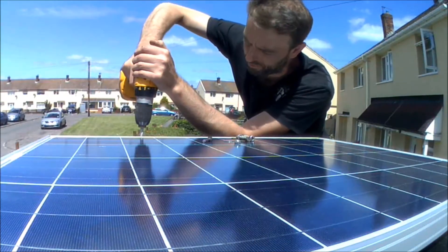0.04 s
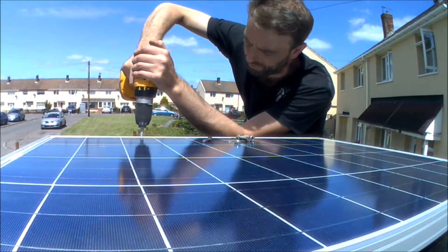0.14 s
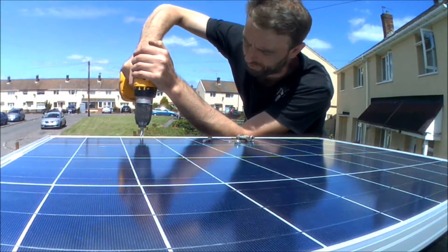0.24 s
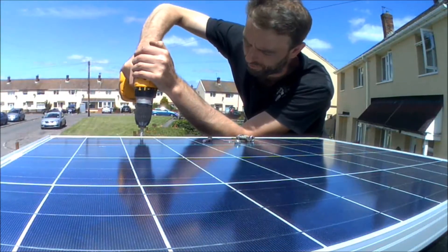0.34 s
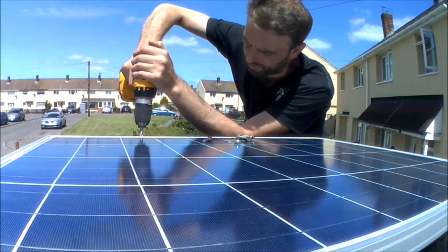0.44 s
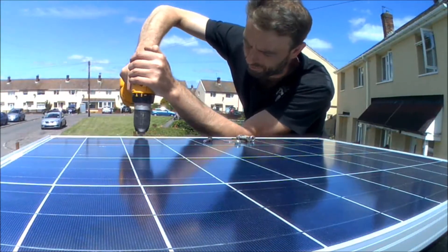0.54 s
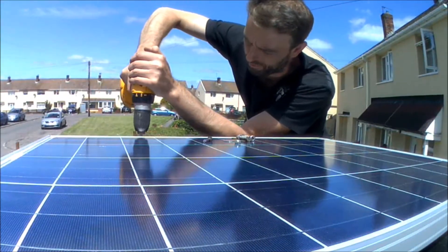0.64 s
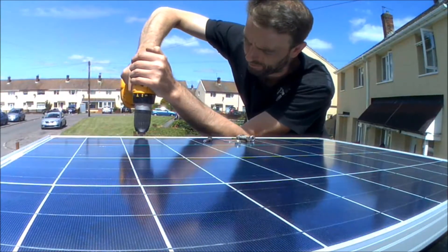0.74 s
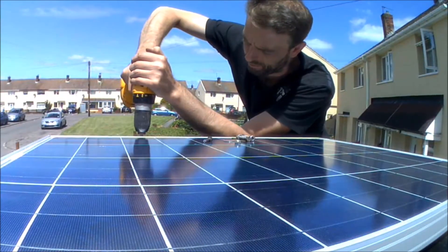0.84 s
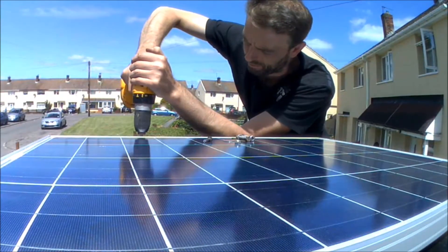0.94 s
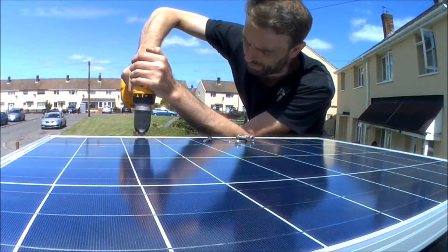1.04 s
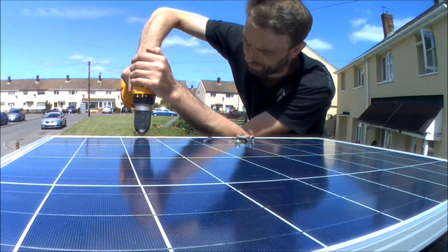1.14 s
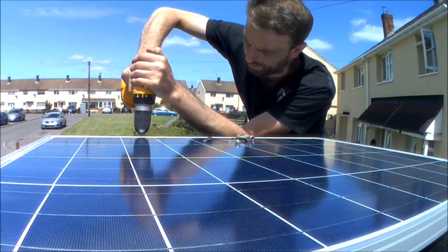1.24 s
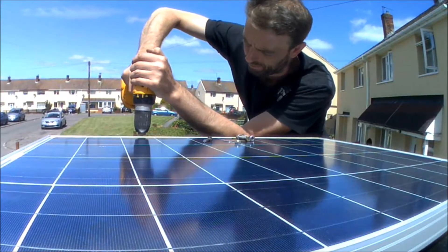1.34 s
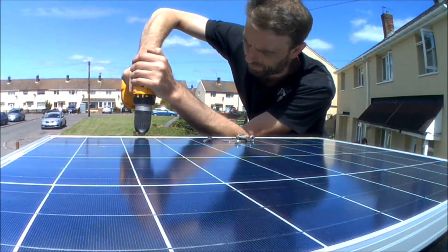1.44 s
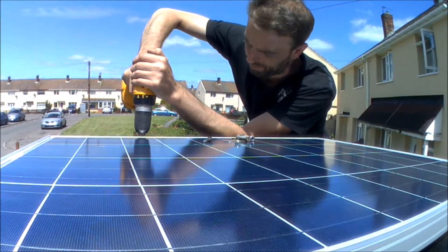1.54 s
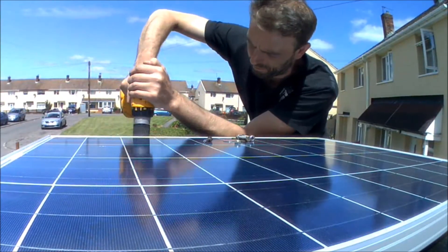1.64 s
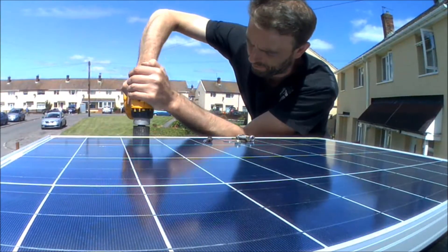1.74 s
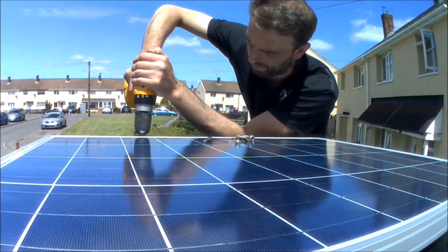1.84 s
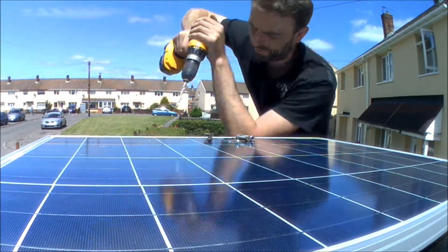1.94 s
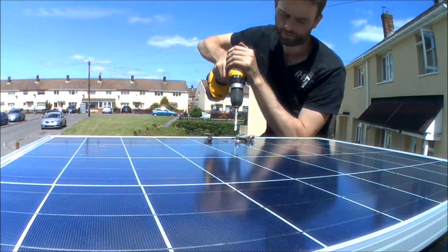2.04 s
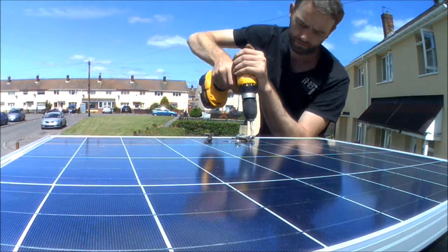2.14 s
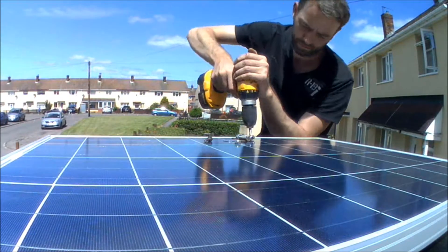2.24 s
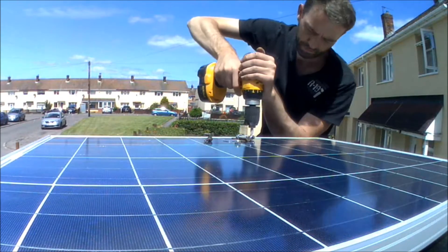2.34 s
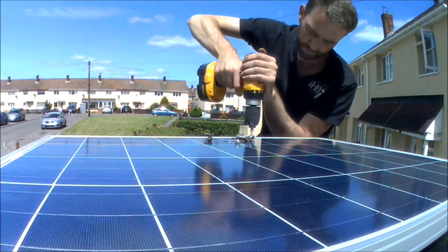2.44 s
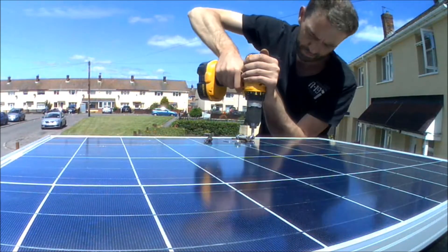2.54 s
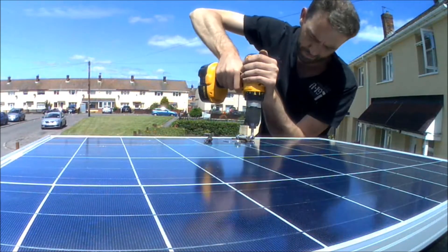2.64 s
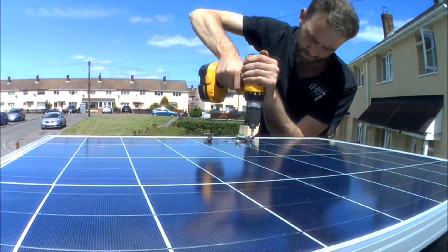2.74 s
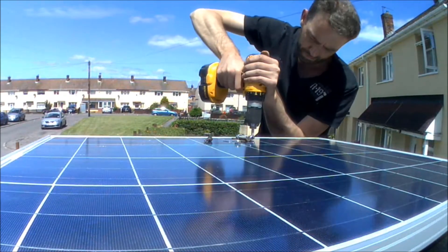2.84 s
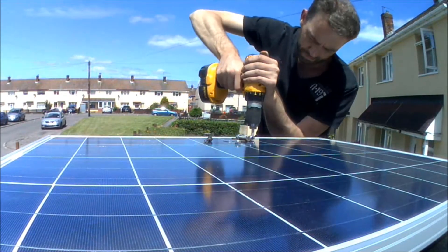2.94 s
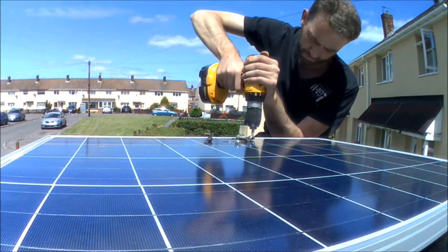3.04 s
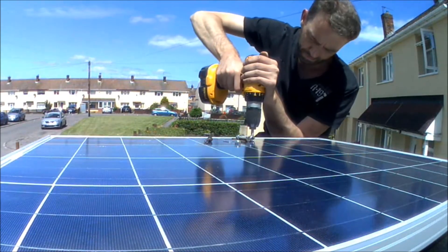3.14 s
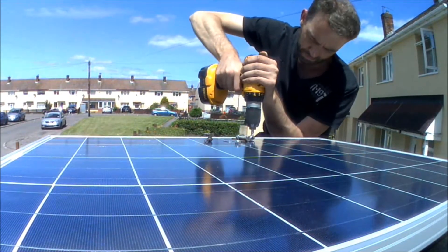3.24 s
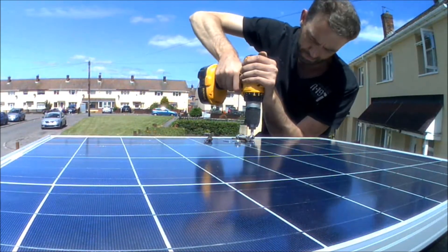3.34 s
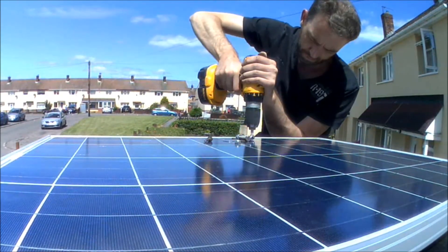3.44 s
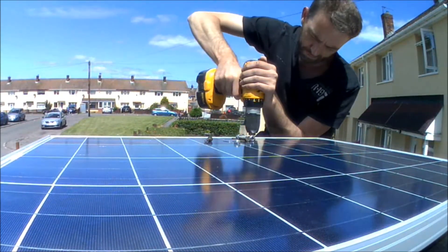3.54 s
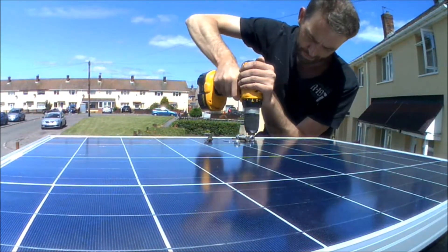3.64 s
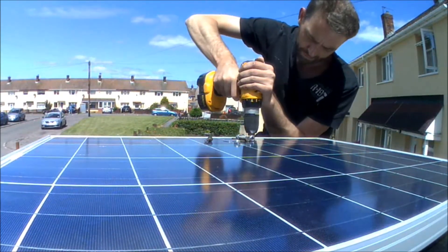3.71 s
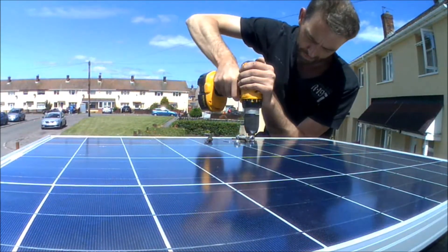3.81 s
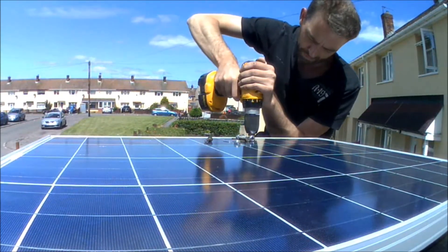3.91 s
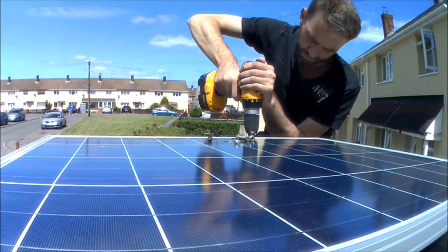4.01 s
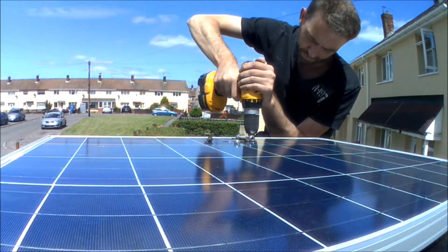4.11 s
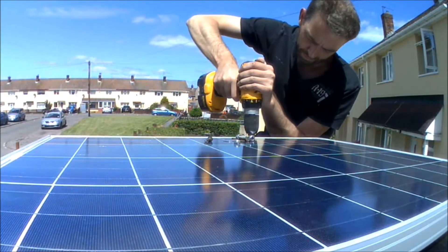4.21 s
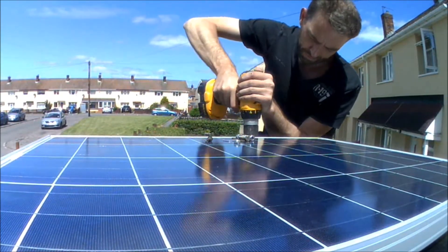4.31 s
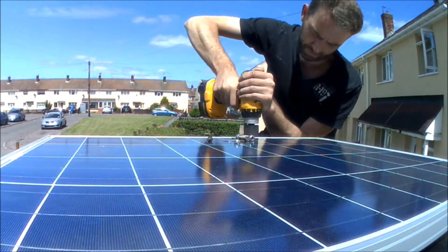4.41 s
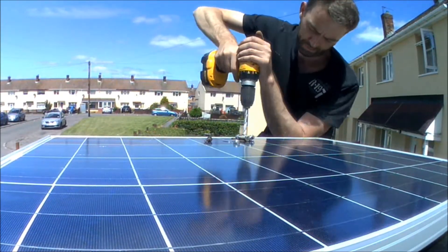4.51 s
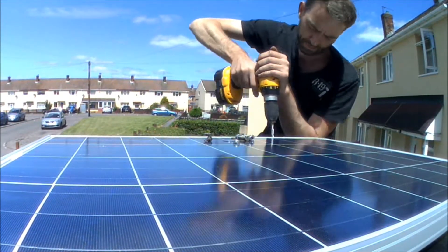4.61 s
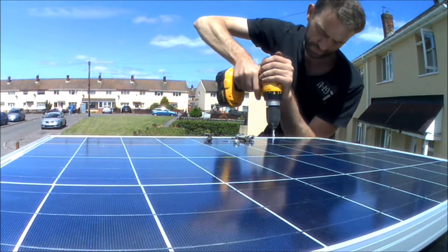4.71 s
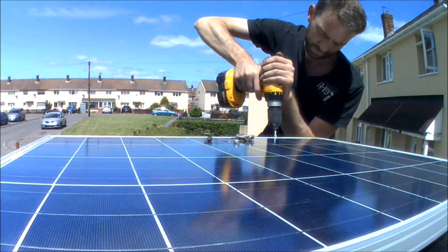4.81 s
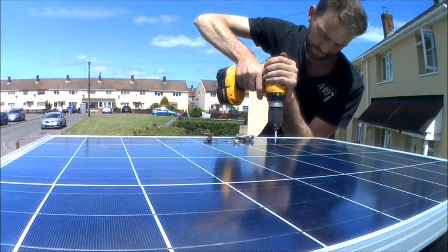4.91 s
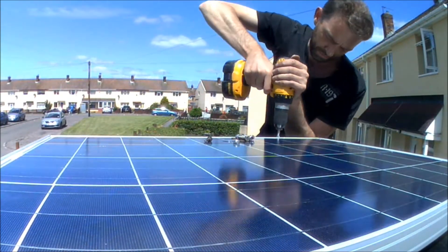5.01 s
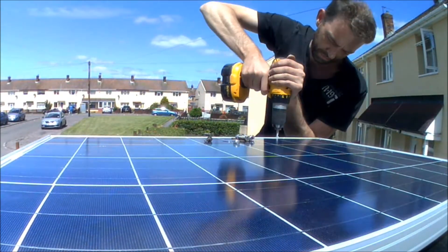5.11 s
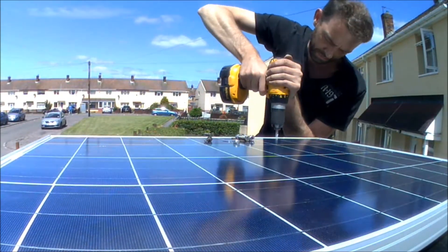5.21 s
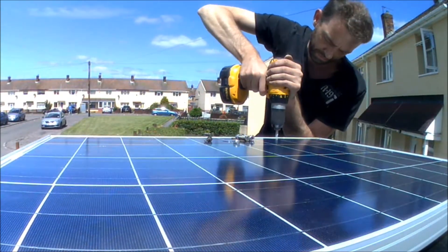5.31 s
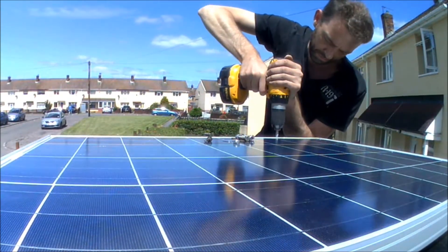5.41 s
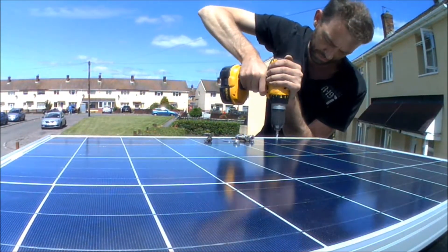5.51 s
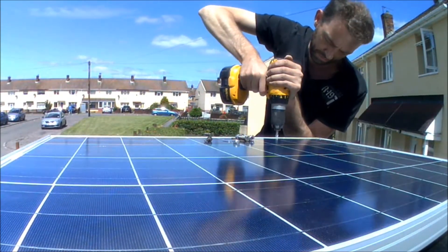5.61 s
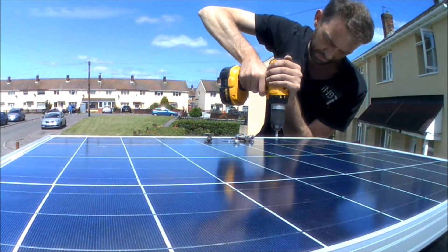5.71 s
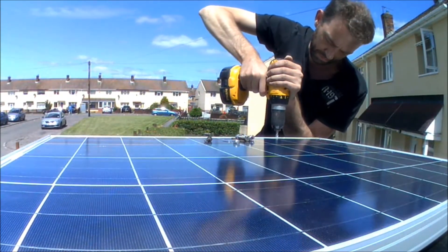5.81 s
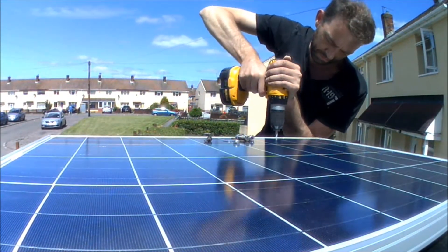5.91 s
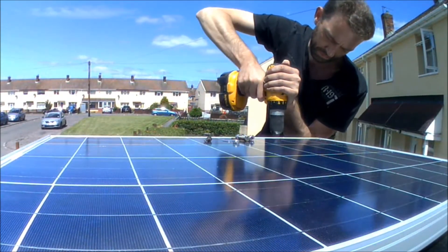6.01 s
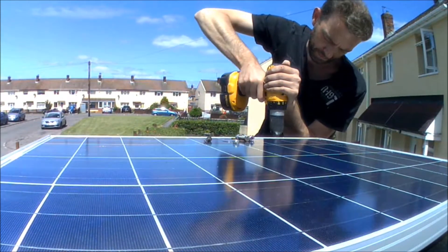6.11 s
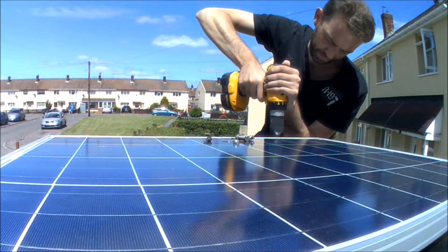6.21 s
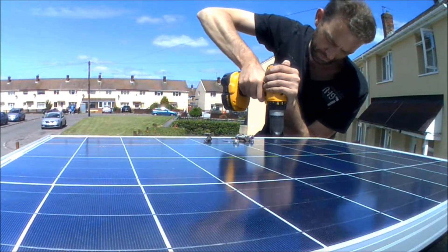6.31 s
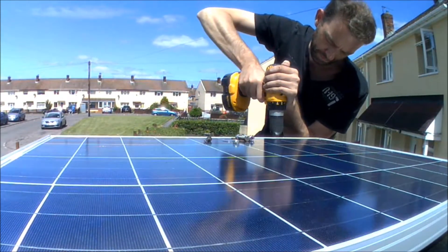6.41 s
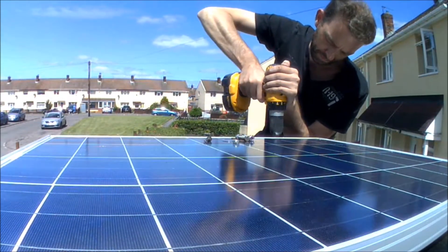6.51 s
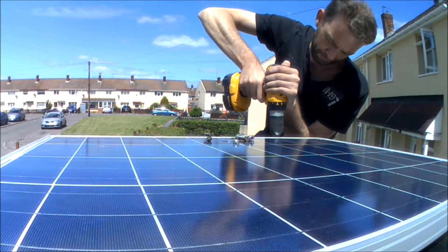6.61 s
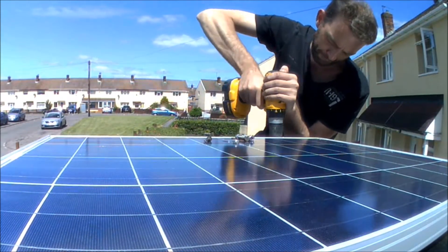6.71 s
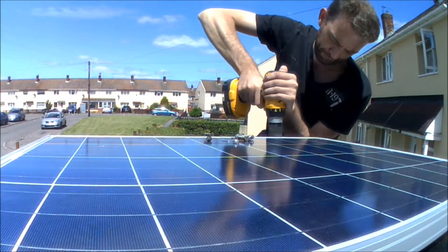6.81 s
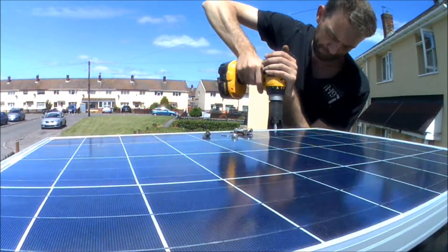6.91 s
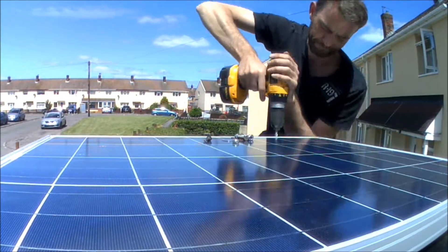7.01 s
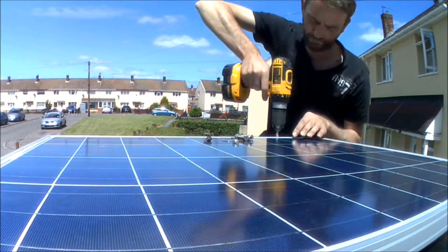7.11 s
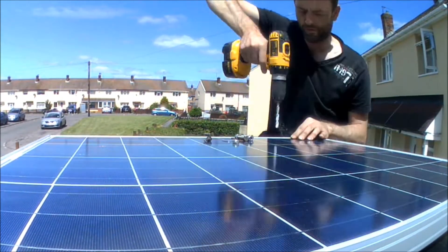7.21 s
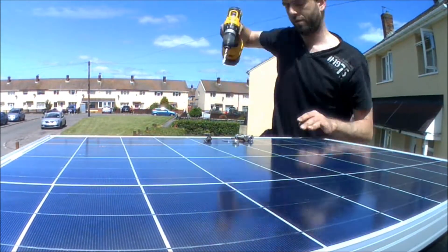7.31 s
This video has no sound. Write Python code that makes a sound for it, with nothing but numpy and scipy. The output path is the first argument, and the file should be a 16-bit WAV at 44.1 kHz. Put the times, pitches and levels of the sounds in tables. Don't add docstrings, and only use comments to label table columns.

```python
import sys
import numpy as np
from scipy import signal
from scipy.fft import rfft, irfft, next_fast_len
from scipy.io import wavfile
from scipy.ndimage import uniform_filter1d

SR = 44100
rng = np.random.default_rng(int(sys.argv[2]) if len(sys.argv) > 2 else 0)


def pcm_store(signal):
    levels = np.round(np.clip(np.atleast_2d(signal), -1, 1) * 32767)
    wavfile.write(sys.argv[1], SR, levels.astype(np.int16).T)


def volts_from_db(level):
    exponent = np.asarray(level, float) / 20
    return 10 ** exponent


N = 324135
TIME = np.arange(N) / SR

# f/Hz, density/dB
STREET_SPECTRUM = [(15, -10.5), (40, -16), (90, -18.5), (200, -35), (400, -29.5), (2500, -25.5),
                   (4300, -25.5), (5700, -32), (9000, -40), (16000, -45)]
# t/s, gust level/dB
GUSTS = [(0.0, -86), (0.57, -76), (1.4, -82), (1.72, -48), (1.79, -88), (1.88, -47), (1.95, -66),
         (2.74, -66.5), (2.86, -43), (2.97, -55), (3.75, -43), (4.1, -58), (4.5, -43), (5.0, -66.5),
         (5.7, -56), (6.7, -61), (6.96, -46), (7.35, -46.5)]
# t/s, peak/dB, f/Hz
LOW_POPS = [(2.888, -33, 450), (2.924, -33.5, 396.3), (3.775, -32, 420), (3.81, -33, 602),
            (3.84, -30, 850), (3.87, -31, 380), (3.935, -32, 560), (3.962, -31, 700), (3.975, -33, 320),
            (3.828, -23.5, 498), (3.855, -23.5, 667.6), (3.946, -30, 353), (7.132, -26, 292),
            (7.169, -30, 520), (7.184, -31, 428), (7.199, -38, 350)]
# start/s, end/s,
# f from/Hz, f to/Hz, level/dB
TOOL_SQUEAKS = [(1.798, 1.85, 1105, 1085, -40), (1.962, 1.992, 3800, 3740, -57),
                (2.0, 2.046, 3650, 4010, -61), (2.086, 2.13, 4290, 4360, -58),
                (2.15, 2.19, 4350, 4330, -69), (2.09, 2.135, 6420, 6600, -67), (2.15, 2.2, 6560, 6600, -72),
                (2.07, 2.095, 7000, 7050, -71), (2.296, 2.316, 4200, 4270, -60),
                (2.335, 2.35, 4200, 4350, -64), (2.297, 2.307, 6320, 6320, -65),
                (4.655, 4.7, 1370, 1400, -63), (4.738, 4.785, 1200, 1110, -62),
                (4.805, 4.85, 1070, 1010, -67), (4.935, 4.955, 6900, 6900, -68),
                (4.945, 4.988, 2030, 1900, -61), (5.0, 5.07, 2380, 2340, -60),
                (7.12, 7.129, 14200, 11000, -62), (7.3, 7.309, 13500, 11000, -68)]
# start/s, end/s,
# f/Hz, width/Hz, level/dB
METAL_SQUEALS = [(1.795, 1.85, 1090, 60, -44), (1.795, 1.852, 3290, 260, -36),
                 (1.81, 1.855, 2890, 100, -39), (1.795, 1.885, 3900, 2400, -35.5),
                 (1.92, 1.95, 4500, 5000, -50), (6.77, 6.81, 800, 900, -38), (7.16, 7.21, 700, 900, -43),
                 (7.03, 7.05, 700, 900, -46), (6.015, 6.056, 4600, 500, -40),
                 (6.03, 6.055, 7000, 3000, -46), (7.228, 7.243, 4700, 2500, -38),
                 (4.305, 4.33, 1400, 900, -40), (4.68, 4.69, 2720, 120, -44),
                 (7.056, 7.066, 2700, 200, -37), (2.267, 2.274, 2800, 200, -52),
                 (1.605, 1.63, 1900, 900, -40)]

# t/s, peak/dB
BREAKTHROUGH_SNAPS = [
    (.5627, -3),
    (3.5208, -3),
    (4.5178, -8),
    (5.9916, -6),
]
# t/s, peak/dB, thud rel/dB, ring f/Hz
BREAK_BLOWS = [
    (0.567, -3, -17, 7200),
    (3.508, -21, -25, 6460),
    (3.525, -3.5, -13, 2720),
    (4.514, -12, -40, 4160),
    (4.524, -5, -20, 1760),
    (5.978, -7.5, -21, 4800),
    (5.993, -3, -14, 1573),
]
# t/s, peak/dB, thud rel/dB, ring f/Hz
CHUCK_RATTLES = [(0.553, -15, -6, 4670), (0.564, -4, -11, 1880), (1.637, -20, -9, 900),
                 (1.701, -25, -32, 4300), (1.753, -17.5, -34, 3430), (1.91, -9, -17.5, 4143),
                 (3.521, -3, -11.5, 1540), (3.534, -13, -25, 2633), (4.454, -16, -44, 2850),
                 (4.487, -27, -20, 2947), (4.518, -6, -22, 4300), (5.12, -16, -25, 2730),
                 (5.15, -19, -23, 2820), (5.188, -18, -28, 2827), (6.006, -9.5, -19, 2920),
                 (6.636, -19, -34, 2700), (6.865, -16.5, -44, 4300), (7.043, -20.5, -6.5, 1706),
                 (7.067, -22, -5, 1730), (7.264, -20, -23, 4130)]
# t/s, peak/dB, thud rel/dB, ring f/Hz
CHUCK_CRACKS = [
    (1.646, -15, -14, 4570),
    (4.464, -14, -26, 2800),
    (4.555, -16, -16, 1845),
    (6.759, -6.5, -17.5, 4533),
    (6.775, -24.5, 4, 2802),
    (6.793, -21, -4, 4574),
    (6.889, -15, -35, 4560),
    (6.941, -15, -12.5, 2210),
    (6.948, -13, -10, 4570),
    (7.053, -12, -38, 2713),
]
# t/s, peak/dB, thud rel/dB, ring f/Hz
TIP_TAPS = [
    (2.268, -23, -9, 1400),
    (2.261, -34, -20, 7200),
    (2.516, -26.5, -2, 1155),
    (4.862, -35, -12, 2690),
    (4.871, -33, -11, 1700),
    (4.951, -32.5, -7, 1000),
    (4.988, -26.5, -9, 1247),
    (7.128, -45, 18, 1072),
]
# t/s, peak/dB, thud rel/dB, ring f/Hz
SWITCH_TICKS = [
    (2.563, -31, -20, 4800),
    (2.428, -40, -5, 6600),
    (4.679, -23, -25, 2750),
    (4.723, -26.5, -35, 5700),
    (6.995, -36, -30, 7850),
    (7.249, -8.5, -21, 4600),
]
# t/s, peak/dB, thud rel/dB, ring f/Hz
METAL_CLINKS = [
    (1.636, -13, -8, 3400),
    (1.922, -13, -30, 6600),
    (6.831, -19, -20, 1450),
    (7.219, -20.5, -25, 4630),
    (7.25, -13, -30, 5800),
    (1.823, -16, -30, 3260),
]
# f/Hz, width/Hz, level/dB
PANEL_MODES = [(170, 25, -1.5), (300, 50, 2), (440, 80, -2.5), (1292, 110, -3)]
# f/Hz, width/Hz, level/dB
BODY_MODES = [(1740, 110, -4.5), (2080, 90, -10), (2670, 150, 0), (2900, 150, -3), (3550, 150, -10),
              (5640, 150, -10), (6570, 250, -6), (7400, 300, -13)]
# f/Hz, width/Hz, level/dB
EDGE_MODES = [(4300, 220, -2), (4650, 260, 0), (5050, 350, -3), (5900, 700, -11), (15200, 1700, -17)]

# multiple of mesh/1, level/dB, wander/dB
MESH_PARTIALS = [(1, 4, 1.5), (.991, -17, 4), (1.009, -22, 4), (.914, -18, 4)]
# multiple of mesh/1, level/dB
COMMUTATOR_LINES = [(1.796, 3), (1.714, -4), (1.632, -6), (1.653, -9)]
# mesh f/Hz, gain/dB
MESH_GAIN = [(900, -40), (1700, -9), (3600, -10.5), (4050, -1.5), (4300, 3), (4600, 1.5), (4900, 1.5)]
# mesh f/Hz, gain/dB
COMMUTATOR_GAIN = [(1500, -1), (3800, -2), (4300, 4), (4550, 4), (4700, 0.5), (4900, -2.5)]
# multiple of mesh/1, level re hiss/dB, change once tool is turned/dB
GEAR_ORDERS = [(.143, -21, 0), (.327, -17, 0), (.449, -11, -2), (.466, -17, 0), (1.286, -21, 0),
               (1.918, -22, 0), (2, -18, -3), (2.286, -22, 1), (2.347, -21, -2), (2.572, -24, 1),
               (2.858, -21, -6), (3, -17, -9), (3.428, -26, 2), (3.592, -23, 4)]
KNOCK_HARMONICS = [-4, 5, 0, 0, 0, 0, -1, 1, 0, -1, -6, -3, 2, 0, -2, -3, -6, -5, -2, -6, -7, -8]
# f/Hz, density/dB
HISS_SPECTRUM = [(150, -74), (300, -16.5), (1000, -2), (2000, 1), (3200, 0.5), (4600, 4), (5400, -16.5),
                 (6600, -1.5), (8700, -0.5), (10200, -5.5), (11300, -5.5), (12800, -18), (13800, -9),
                 (15500, -8), (16000, 2.5)]
# f/Hz, width/Hz, share added/1
VENT_SHADOW = [(10200, 3100, -0.68), (13400, 1800, 0.94), (6270, 1000, 1)]

# t/s, spun-up mesh f/Hz, bit load/dB
HOLE_1 = [
    [(0.0, 4913, -38), (0.3, 4728, -40), (0.41, 4380, -38), (0.53, 4247, -36.5), (0.56, 4000, -26.5),
     (0.578, 3200, -42), (0.6, 2300, -50), (0.618, 1200, -56)],
    [(0.662, 4843, -40), (1.14, 4727, -39), (1.39, 4668, -40), (1.595, 4303, -39), (1.618, 3409, -35),
     (1.645, 2893, -35.5), (1.664, 2400, -47)],
    [(1.69, 4750, -42), (1.725, 4750, -39), (1.75, 4580, -40), (1.797, 4880, -38.5), (1.82, 4490, -35),
     (1.905, 4500, -35.5)],
]
HOLE_2 = [
    [(2.571, 4000, -46.5), (2.655, 3960, -45.5), (2.69, 4777, -42), (2.75, 4958, -39), (3.2, 4588, -39.5),
     (3.39, 4253, -38.5), (3.503, 4213, -37.5), (3.515, 4010, -24)],
    [(3.55, 4700, -39.5), (4.1, 4630, -40), (4.23, 4320, -40), (4.292, 4226, -40.5), (4.31, 3387, -35.5),
     (4.323, 3330, -37), (4.365, 2350, -39), (4.386, 1900, -52)],
    [(4.436, 1944, -45), (4.456, 2050, -39), (4.534, 2492, -35.5), (4.57, 2741, -48)],
]
HOLE_3 = [
    [(5.052, 4954, -43.5), (5.2, 4870, -41), (5.4, 4728, -42), (5.6, 4535, -41), (5.72, 4333, -39.5),
     (5.87, 3874, -39), (5.98, 3600, -38.5)],
    [(6.02, 4643, -38.5), (6.19, 4575, -40.5), (6.48, 4223, -39.5), (6.64, 3778, -39.5),
     (6.745, 3586, -39.5), (6.764, 3280, -26), (6.81, 3060, -46)],
    [(6.849, 3300, -46), (6.868, 3300, -38), (6.951, 3285, -37), (6.962, 3190, -43)],
]
# mesh whine/dB, motor whine/dB, chatter rel/dB, scream rel/dB, rail hum rel/dB
PULL_CUTS = [(-49, -47, -9, -1, -14.5), (-43, -49, -11, -2, -8.5), (-52, -51, -14, -10, -9.5),
             (-40, -53, -1, 3, -10), (-39.5, -49, -3.5, -1.5, -8), (-59, -62, 1, -20, 1),
             (-44, -53, 0.5, 10.5, -8), (-42.5, -52, -4.5, 3, -12.5), (-55, -43, 2, -1, -3.5)]
QUICK_RESTARTS = [4, 7]
MESH_SPIN_UP = [0, -18, 16, -5.5, -25, 0, -14, -21, 4]
MOTOR_SPIN_UP = [-9, -9, -8, -9, -9, -9, -22, -9, -9]
# start/s, end/s, chatter change/dB, mesh whine change/dB, motor whine change/dB
BITE_CHANGES = [(3.31, 3.5, 3, 0, 0), (3.12, 3.28, -2, 0, 0), (4.335, 4.39, -6, -7, 2),
                (6.9, 6.94, -6, 0, 0), (5.085, 5.2, 3, -2, -3), (1.68, 1.7, 0, -22, -22),
                (0.42, 0.55, 0, 4, 1), (1.59, 1.61, 0, 6, 1), (5.83, 5.98, 0, -5, -3),
                (6.67, 6.76, 0, -5, -5), (5.64, 5.8, 0, 2, 0), (0.3, 0.53, 5, 0, -2),
                (0.675, 0.7, 0, 8, -4), (4.05, 4.29, 2, 0, 0), (4.297, 4.325, -3, 0, 6),
                (1.83, 1.9, 0, 0, -4)]


def rms_one(x):
    return x / np.sqrt(np.mean(x ** 2) + 1e-20)


def peak_one(x):
    return x / np.abs(x).max()


def white():
    return rng.standard_normal(N)


def in_time(tables):
    s, *columns = np.transpose(np.vstack(tables))
    return [np.interp(TIME, s, c) for c in columns]


def along(points, hz):
    return np.interp(hz, *np.transpose(points))


def band(x, low_hz, high_hz, order=2):
    edges_hz = [low_hz, min(high_hz, .45 * SR)]
    return signal.sosfilt(signal.butter(order, edges_hz, "band", fs=SR, output="sos"), x)


def drift(rate_hz):
    r = np.exp(-20 * np.pi * rate_hz / SR)
    slow = signal.lfilter([1], [1, -2 * r, r * r], rng.standard_normal(N // 10 + 4002))[4000:]
    return np.interp(np.arange(N) / 10, np.arange(len(slow)), rms_one(slow))


def coloured(x, spectrum):
    hz, level_db = np.transpose(spectrum)
    size = next_fast_len(N)
    grid_hz = np.fft.rfftfreq(size, 1 / SR) + 1
    gain = volts_from_db(np.interp(np.log(grid_hz), np.log(hz), level_db))
    return rms_one(irfft(rfft(x, size) * gain, size)[:N])


def resonance(x, hz, width_hz):
    r = np.exp(-np.pi * width_hz / SR)
    poles = [1, -2 * r * np.cos(2 * np.pi * hz / SR), r * r]
    return signal.lfilter([(1 - r * r) / 2, 0, (r * r - 1) / 2], poles, x)


def body(x, modes):
    return sum((-1) ** k * volts_from_db(db) * resonance(x, hz, width_hz) for k, (hz, width_hz, db) in enumerate(modes))


def fade(start_s, end_s, rise_s, fall_s):
    before = np.clip(start_s - TIME, 0, 1) / rise_s
    after = np.clip(TIME - end_s, 0, 1) / fall_s
    return volts_from_db(-60 * (before + after))


def street():
    return volts_from_db(-56 + 0.47 * drift(1)) * coloured(white(), STREET_SPECTRUM)


def wind():
    gust_db, = in_time([GUSTS])
    lumps_db = 0.94 * drift(31.0) + 2.0 * drift(12)
    rumble = rms_one(band(white(), 59, 280))
    puff = rms_one(band(white() * volts_from_db(5.8 * drift(32) + lumps_db), 420, 740, order=1))
    return volts_from_db(gust_db) * (volts_from_db(lumps_db) * rumble + volts_from_db(-9) * puff)


def pops():
    out = np.zeros(N)
    for s, peak_db, hz in LOW_POPS:
        cycles = (TIME - s) * hz
        out += volts_from_db(peak_db) * np.exp(-(cycles / 1.034) ** 2) * np.sin(2 * np.pi * cycles)
    return out


def walls(x):
    age_s = np.arange(round(.3 * SR)) / SR
    tail = band(rng.standard_normal(len(age_s)), 210, 6100, order=1) * volts_from_db(-60 * age_s / .2)
    return signal.fftconvolve(x, tail / np.sqrt(np.sum(tail ** 2)))[:N]


def squeaks():
    out = np.zeros(N)
    for start_s, end_s, from_hz, to_hz, db in TOOL_SQUEAKS:
        hz = np.interp(TIME, [start_s, end_s], [from_hz, to_hz])
        out += volts_from_db(db + 3) * fade(start_s, end_s, .03, .03) * np.sin(2 * np.pi * np.cumsum(hz) / SR)
    return out * volts_from_db(2.2 * drift(70))


def squeals():
    rub = white()
    out = np.zeros(N)
    for start_s, end_s, hz, width_hz, db in METAL_SQUEALS:
        tone = rms_one(resonance(resonance(rub, hz, width_hz), hz, width_hz))
        out += volts_from_db(db) * fade(start_s, end_s, 0.014, 0.0097) * tone
    return out


def snaps():
    out = np.zeros(N)
    for s, peak_db in BREAKTHROUGH_SNAPS:
        age_s = TIME - s
        rebound = .3 * np.exp(-((age_s - .0005) / .0003) ** 2)
        out += volts_from_db(peak_db) * (rebound - np.exp(-(age_s / .00008) ** 2))
    return out


def blow(age_s, thud_db, ring_hz, tick_db, t60_s, swell_s):
    noise, jag = rng.standard_normal((2, len(age_s)))
    rattle = noise * volts_from_db(18 * uniform_filter1d(jag, size=30) - 60 * age_s / t60_s)
    rattle *= np.minimum(age_s / swell_s + 0.3, 1)
    thud = peak_one(band(rattle, 168, 1470))
    knock = peak_one(band(rattle, 1000, 5500)) + peak_one(resonance(rattle, ring_hz, .13 * ring_hz))
    tick = peak_one(band(rattle - 0.6 * resonance(rattle, 12300, 2500), 3000, 30000))
    return volts_from_db(thud_db) * thud + volts_from_db(-9.0) * knock + volts_from_db(tick_db) * tick


def clacks():
    # blows, tick rel/dB, t60/s, swell/s
    kinds = [(BREAK_BLOWS, -4, 0.046, .002), (CHUCK_RATTLES, -15, 0.041, .002), (CHUCK_CRACKS, -7.5, 0.036, .004),
             (TIP_TAPS, -14, 0.052, .0015), (SWITCH_TICKS, -22, 0.035, .0008), (METAL_CLINKS, -11, 0.016, .0004)]
    out = snaps()
    age_s = np.arange(round(.15 * SR)) / SR
    for rows, *kind in kinds:
        for s, peak_db, thud_db, ring_hz in rows:
            at = round(s * SR)
            hit = volts_from_db(peak_db) * blow(age_s, thud_db, ring_hz, *kind)
            out[at:at + len(age_s)] += hit[:N - at]
    return out + volts_from_db(-32.0) * body(out, list(BODY_MODES) + list(EDGE_MODES)) + volts_from_db(6.5) * body(out, PANEL_MODES)


def trigger():
    spin_up_s, restart_share, restart_lag_s = .027, .76, .022
    rush_power, bite_power = 0.5, 2.1
    pulls = list(HOLE_1) + list(HOLE_2) + list(HOLE_3)
    starts_s, ends_s = np.transpose([(p[0][0], p[-1][0]) for p in pulls])
    mesh_hz, load_db = in_time(pulls)
    switch_s = (np.r_[0, ends_s[:-1]] + starts_s) / 2
    pull = np.clip(np.searchsorted(switch_s, TIME, "right") - 1, 0, None)
    turning = np.r_[1, restart_share * np.isin(np.arange(1, len(pulls)), QUICK_RESTARTS)]
    since_s = np.maximum(TIME - starts_s[pull] - restart_lag_s * np.isin(pull, QUICK_RESTARTS), 0)
    spun = np.clip(1 - (1 - turning[pull]) * np.exp(-since_s / spin_up_s), .05, 1)
    running = np.max([fade(a, b, 0.01, 0.018) for a, b in zip(starts_s, ends_s)], axis=0)
    lack_db = 20 * np.log10(spun)
    cut_db = np.array(PULL_CUTS, float)[pull].T
    cut_db[0] += np.array(MESH_SPIN_UP)[pull] * np.minimum(1.9 * (1 - spun), 1)
    cut_db[1] += np.array(MOTOR_SPIN_UP)[pull] * np.minimum(14.0 * (1 - spun), 1)
    cut_db[2:4] += bite_power * lack_db
    for start_s, end_s, chatter_db, mesh_db, motor_db in BITE_CHANGES:
        cut_db[:3] += np.outer([mesh_db, motor_db, chatter_db], fade(start_s, end_s, .1, .04))
    return mesh_hz * spun, load_db + rush_power * lack_db, running, cut_db


def rail_hum():
    return rms_one(band(white() * volts_from_db(2.2 * drift(31) + 2.0 * drift(1.3)), 260, 1500, order=1))


def scream():
    return rms_one(body(white() * volts_from_db(2.0 * drift(140) + 2.0 * drift(12)), EDGE_MODES))


def chatter(carrier):
    beat = volts_from_db(6 * np.cos(2 * carrier) + 2.2 * drift(70) + .8 * drift(4))
    return rms_one(body(white() * beat, BODY_MODES))


def growl(carrier):
    return sum(volts_from_db(1.8 * drift(2) + db) * np.sin(k * carrier + k * k) for k, db in enumerate(KNOCK_HARMONICS, 2))


def vent_hiss(phase, turned):
    rotor = 1 + 0.17 * np.cos(phase / 9.9)
    hiss = coloured(white() * rotor * volts_from_db(2.13 * drift(82)), HISS_SPECTRUM)
    shadow = sum(share * resonance(hiss, hz, width_hz) for hz, width_hz, share in VENT_SHADOW)
    return hiss + ~turned * shadow


def gear_orders(phase, turned):
    return sum(volts_from_db(db + turned_db * turned + 2 * drift(8)) * np.sin(k * phase) for k, db, turned_db in GEAR_ORDERS)


def commutator(phase, brake_db):
    return sum(volts_from_db(db + brake_db * (db > 0) + 1.5 * drift(20)) * np.sin(k * phase) for k, db in COMMUTATOR_LINES)


def gear_mesh(phase):
    return sum(volts_from_db(db + wander_db * drift(37)) * np.sin(k * phase) for k, db, wander_db in MESH_PARTIALS)


def drill():
    mesh_hz, load_db, running, (mesh_db, motor_db, chatter_db, scream_db, hum_db) = trigger()
    mesh_hz = uniform_filter1d(mesh_hz, size=300)
    accel = np.gradient(mesh_hz) * SR
    turned = TIME >= 2.2

    strain_db = np.minimum(np.abs(accel) / 8000, 5)
    strain_db += 1.5 * np.minimum(load_db + 41, 0) * np.clip(-accel / 5000, 0, 1)
    brake_db = 7 * np.clip(-accel / 25000 - .6, 0, 1)
    unload_db = np.clip(-accel / 12000 - 1, 0, 1)
    blur_db = 0.457 * np.maximum(scream_db + 2.5, 0) * drift(220)
    mesh_db = mesh_db + along(MESH_GAIN, mesh_hz) + 0.68 * drift(2.2) + blur_db - unload_db
    motor_db = motor_db + along(COMMUTATOR_GAIN, mesh_hz) + 1.5 * drift(5)

    jitter = 0.00041 * (1 + .4 * np.maximum(scream_db, 0)) * drift(21.0)
    phase = 2 * np.pi * np.cumsum(mesh_hz * (1 + jitter)) / SR
    carrier = phase / 107.8

    whines = volts_from_db(mesh_db + strain_db) * gear_mesh(phase)
    whines += volts_from_db(motor_db + strain_db) * commutator(phase, brake_db)
    loaded = volts_from_db(2.5) * vent_hiss(phase, turned) + gear_orders(phase, turned)
    loaded += volts_from_db(chatter_db + 2.5) * chatter(carrier)
    loaded += volts_from_db(scream_db - 3.0) * scream()
    loaded += volts_from_db(hum_db) * rail_hum()
    loaded += volts_from_db(0.48 * hum_db - 18) * growl(carrier)
    return running * (whines + volts_from_db(load_db) * loaded)


def scene():
    background = street() + wind() + pops()
    tool = squeals() + clacks() + drill()
    return (background + squeaks() + tool + volts_from_db(-20.5) * walls(tool))[None]


def low_pass(x):
    return signal.sosfilt(signal.butter(12, 17150, fs=SR, output="sos"), x)


def record(dry):
    cutoff_hz, offset = 15900, -.0118
    cut = signal.sosfilt(signal.cheby2(16, 45, cutoff_hz * 1.015, fs=SR, output="sos"), dry)
    return low_pass(cut + offset)


dry = scene()
out = record(dry)
pcm_store(out)
```